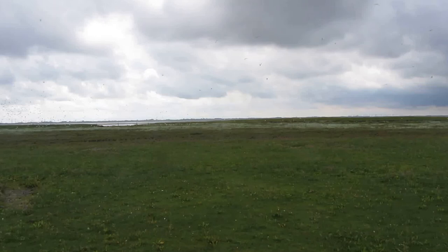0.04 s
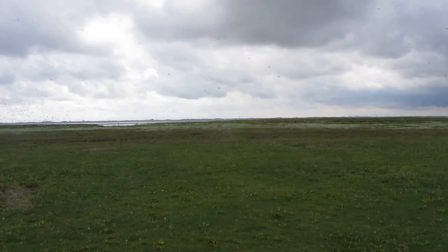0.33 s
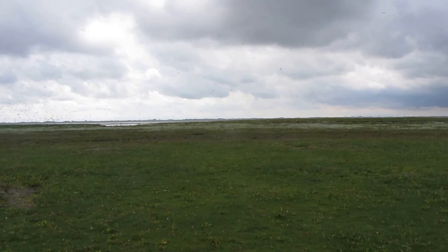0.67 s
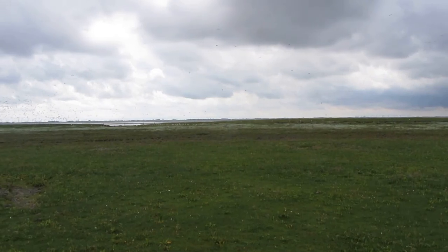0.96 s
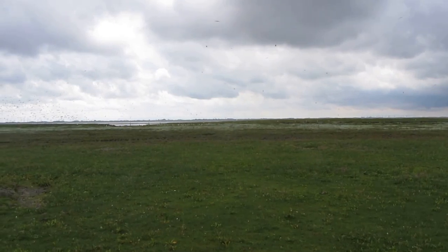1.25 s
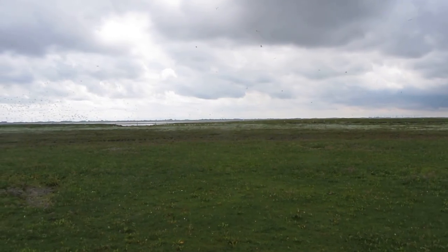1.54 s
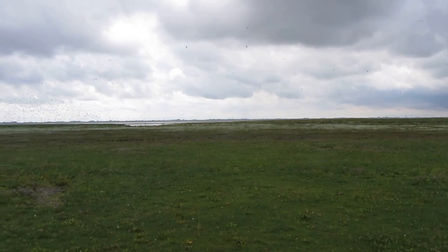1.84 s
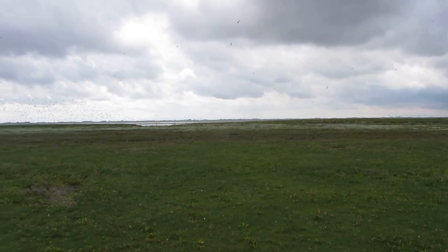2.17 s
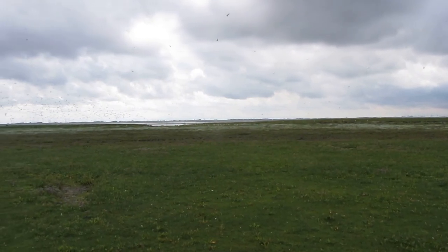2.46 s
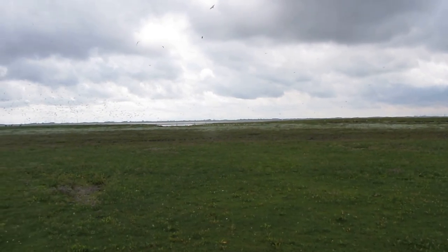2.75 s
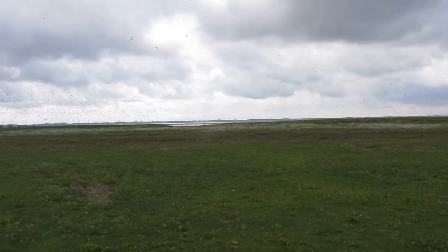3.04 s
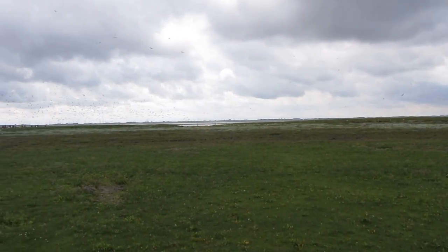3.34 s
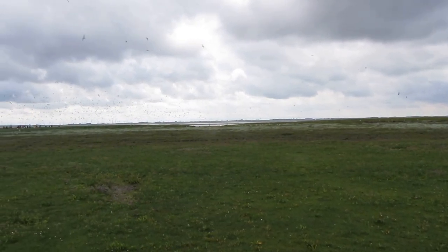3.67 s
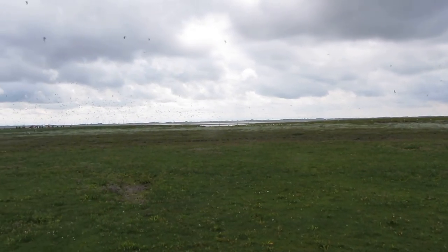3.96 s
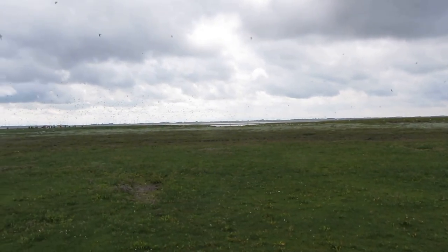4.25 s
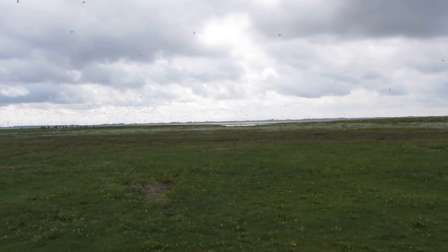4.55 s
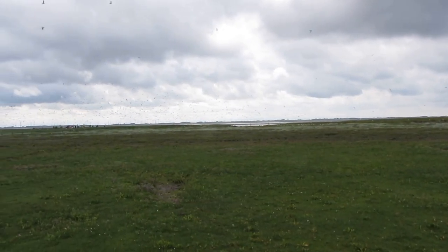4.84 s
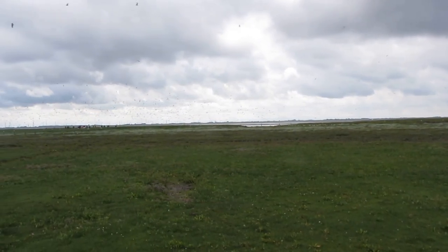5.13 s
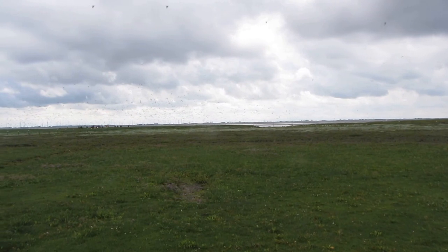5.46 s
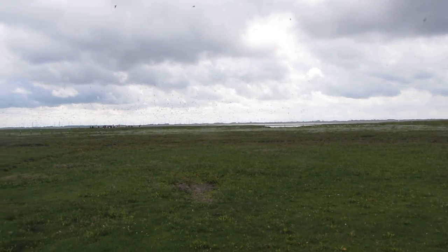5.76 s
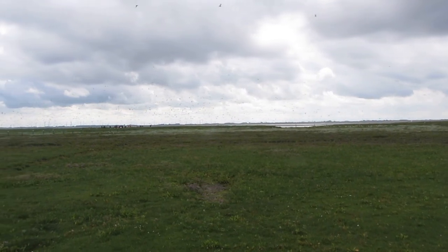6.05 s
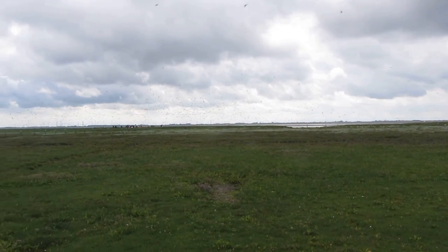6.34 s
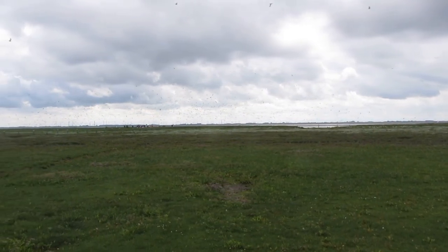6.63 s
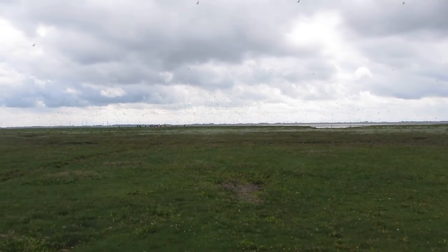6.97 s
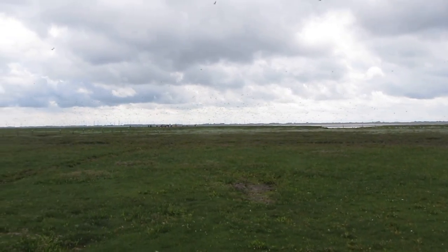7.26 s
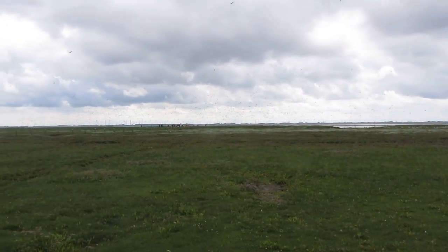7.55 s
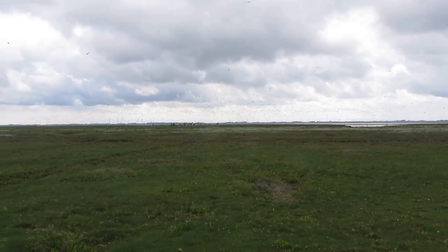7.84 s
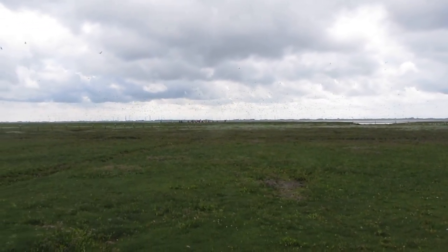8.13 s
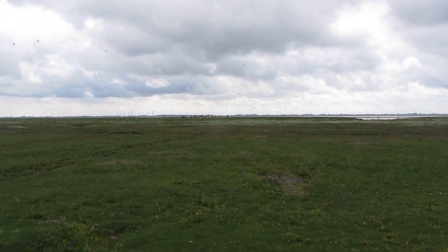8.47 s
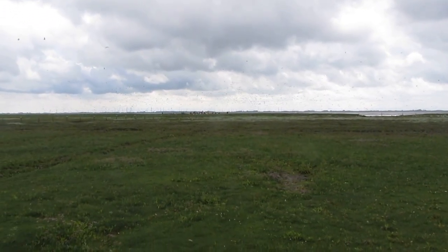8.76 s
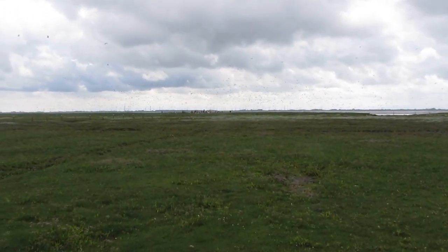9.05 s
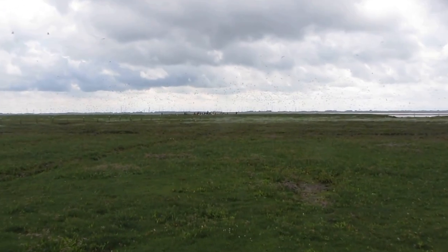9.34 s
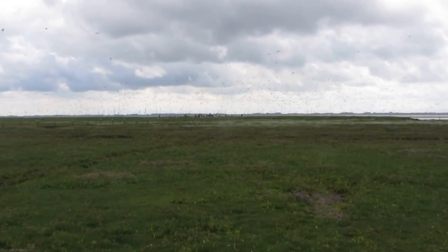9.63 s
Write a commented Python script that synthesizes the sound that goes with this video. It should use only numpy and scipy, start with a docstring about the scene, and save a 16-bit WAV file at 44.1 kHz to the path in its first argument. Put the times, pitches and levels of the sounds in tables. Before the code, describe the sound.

Wind buffets the microphone in an open coastal meadow while far gulls chatter and a nearer bird gives occasional thin, fluttering squeals.

```python
"""Wind on an open coastal meadow. From the start, grass and a far gull colony hiss while eddies rumble
and flap at a camera's two microphone ports, mostly the left. From 0.9 s a nearer bird gives runs of thin,
fluttering squeals, each trailed by a soft sizzle. By 1.5 s faint high twittering has risen and a few
clear mews begin. At 3.3-3.9 s something brushes the camera: small clicks, then a short scrape.
The loudest squeal comes at 4.4 s; from there on the gusts strike mostly the right port."""
import sys
import numpy as np
from scipy import signal
from scipy.fft import rfft, irfft, next_fast_len
from scipy.io import wavfile
from scipy.ndimage import uniform_filter1d, map_coordinates

SR = 44100
rng = np.random.default_rng(int(sys.argv[2]) if len(sys.argv) > 2 else 0)


def materialize(psi):
    """Save the field psi as 16-bit PCM at rate SR to the path in sys.argv[1].

    A 1-D psi becomes a single channel; in a 2-D psi each row is a channel.
    """
    bounded = np.clip(np.atleast_2d(psi).T, -1, 1)
    quanta = np.round(bounded * 32767).astype(np.int16)
    wavfile.write(sys.argv[1], SR, quanta)


N = 436590

# left-right likeness of far noise: freq_hz, coherence
FAR_COHERENCE = [(300, 0.84), (1300, 0.65), (2200, 0.71), (4000, 0.21), (6000, 0.43), (11000, 0.48)]


def amp(db):
    """Decibels to gain."""
    return np.exp(np.asarray(db) * (np.log(10) / 20))


def unit(x):
    """Scale to rms 1."""
    return x / np.sqrt(np.mean(x ** 2) + 1e-20)


def along(points, hz):
    """Interpolate (freq_hz, value) points on a log axis."""
    freq_hz, values = np.transpose(points)
    return np.interp(np.log(hz + 1), np.log(freq_hz + 1), values)


def curves(rows):
    """One value per sample for each column after time_s."""
    time_s, *columns = np.transpose(rows)
    return [np.interp(np.arange(N) / SR, time_s, column) for column in columns]


def wobble(rate_hz):
    """Smooth random curve with knots at rate_hz."""
    coarse = np.arange(0, N + 8, 8)
    knots = rng.standard_normal(int(N * rate_hz / SR) + 4)
    return np.interp(np.arange(N), coarse, map_coordinates(knots, [coarse * rate_hz / SR]))


def swell(length_s, attack_s, release_s):
    """Linear attack, hold and release, peak 1."""
    end_s = max(length_s, attack_s) + attack_s / 2
    t = np.arange(int((end_s + release_s) * SR)) / SR
    return np.interp(t, [0, attack_s, end_s, end_s + release_s], [0, 1, 1, 0])


def filtered(x, response):
    """Apply the complex gain response(hz)."""
    size = next_fast_len(N + SR // 4)
    gain = response(np.fft.rfftfreq(size, 1 / SR)).astype(np.complex64)
    return irfft(rfft(x.astype(np.float32), size) * gain, size)[..., :N]


def panned(side_db):
    """Constant-power gains; side_db is left minus right."""
    gains = amp(np.array([side_db, -side_db]) / 2).reshape(2, -1)
    return gains / np.sqrt(np.mean(gains ** 2, axis=0))


def add(out, start_s, sound):
    """Mix a sound in at start_s."""
    part = out[..., max(round(start_s * SR), 0):][..., :sound.shape[-1]]
    part += sound[..., :part.shape[-1]]


def rush(spectrum, coherence, patchy_db):
    """Stereo noise of rms 1 with random gain patches in time and frequency."""
    bins = rng.standard_normal((2, 257, 2 * (N // 256 + 3))).view(complex)
    patches = uniform_filter1d(rng.standard_normal(bins.shape[1:]), size=5, axis=0)
    patches = unit(uniform_filter1d(patches, size=14, axis=1))
    pair = signal.istft(bins * amp(patchy_db * patches), nperseg=512, window="cosine")[1][:, :N]
    mid_side_power = lambda hz: 1 + np.outer([1, -1], np.clip(along(coherence, hz), -1, 1))
    mid, side = filtered(pair, lambda hz: amp(along(spectrum, hz)) * np.sqrt(mid_side_power(hz)))
    return unit(np.array([mid + side, mid - side]))


def chatter(band, rate_hz, pitch_hz, log_spread, size_db):
    """Overlapping far cries, rms 1; each a short pitch arch from its own direction."""
    out, jitter = np.zeros((2, N)), wobble(400)
    u = np.linspace(0, 1, SR // 8)
    for when, pitch, size, crest, side in rng.random((int(rate_hz * N / SR), 5)):
        start = int(when * (N - len(u)))
        arch = 1 - .35 * (u - crest) ** 2 + .012 * jitter[start:][:len(u)]
        hz = pitch_hz * np.exp(log_spread * (2 * pitch - 1)) * arch
        phase = 2 * np.pi * np.cumsum(hz) / SR
        cry = np.sin(phase) + .8 * np.sin(2 * phase) + .5 * np.sin(3 * phase)
        add(out, start / SR, amp(size_db * size ** 2) * panned(6 * (side - .5)) * u * (1 - u) * cry)
    return unit(filtered(out, lambda hz: amp(along(band, hz))))


def voice(pitch_hz, partials):
    """Harmonic tone, slightly early at the left port."""
    lead_rad = np.array([[.04], [-.04]])
    phase = 2 * np.pi * np.cumsum(pitch_hz) / SR + lead_rad
    return np.sqrt(2) * sum(amp(db) * np.sin(k * phase + rng.random() * 2 * np.pi) for k, db in partials)


def from_afar(pair):
    """Far sound leads at the left port, except in the lows."""
    # phase between ports: freq_hz, left_lead_rad
    port_lead = [(1000, -0.7), (2000, 0.34), (3200, 1.13), (4400, 2.5), (6000, 4), (8000, 5), (11000, 3)]
    return filtered(pair, lambda hz: np.exp(.5j * np.outer([1, -1], along(port_lead, hz))))


def twitter():
    """Thin chirps of far small birds blur into a high band."""
    # flock loudness: time_s, level_db
    levels = [(0.2, -51.5), (1.5, -41.5), (2.4, -44), (3.3, -45.5), (4.3, -51), (5.6, -61), (9.9, -51)]
    # chirp spectrum: freq_hz, density_db
    band = [(3500, -25.5), (4500, -1), (5300, -0.5), (5900, -6), (7000, -24), (9000, -52.5)]
    level_db, = curves(levels)
    chirps = chatter(band, rate_hz=20, pitch_hz=5100, log_spread=.17, size_db=8)
    return amp(level_db) * (amp(-9.5) * chirps + rush(band, FAR_COHERENCE, patchy_db=3.5))


def colony_and_grass():
    """Far gulls and grass blades merge into a hiss; the nearest voices chatter in it."""
    # din loudness: time_s, level_db
    levels = [(0.2, -32), (0.39, -32.5), (1.28, -28), (2.9, -24.5), (3.06, -21.5), (4.58, -25.5),
              (5.98, -22.5), (6.04, -26.5), (6.22, -25.5), (6.28, -30.5), (7.6, -26.5), (7.9, -29),
              (8.46, -26.5), (8.87, -29.5), (9.19, -28.5), (9.25, -29.5), (9.57, -25), (9.9, -24.5)]
    # spectra of the din, its low wash and the grass top: freq_hz, density_db
    din_band = [(590, -61.5), (1000, -19), (1200, -19.5), (1340, -8.5), (1500, -9.5), (1980, -2.5),
                (2120, -1.5), (2800, -4), (3450, -16), (5440, -17), (7500, -40.5), (9750, -73),
                (16500, -120)]
    wash_band = [(100, -33), (250, -12), (500, -30.5), (750, -25.5), (1000, -12), (1200, -17),
                 (1500, -71.5)]
    top_band = [(2500, -30), (3800, -1), (5200, 1), (7500, 3), (9000, -3), (10500, -16), (12500, -29),
                (15500, -31)]
    level_db, = curves(levels)
    side_db = 0.7 - 0.3 * np.arange(N) / SR  # drifts right as the camera turns
    hiss = rush(din_band, FAR_COHERENCE, patchy_db=1.03)
    cries = chatter(din_band, rate_hz=45, pitch_hz=2150, log_spread=.3, size_db=8) * amp(-5)
    wash = rush(wash_band, FAR_COHERENCE, patchy_db=1.5) * amp(-21)
    top_db = -30 - 0.28 * (level_db - level_db.mean())  # swells less than the din
    top = rush(top_band, FAR_COHERENCE, patchy_db=3.0) * amp(top_db + 1.1 * wobble(4.6))
    return (hiss + cries + wash + top) * amp(level_db) * panned(side_db)


def gulls():
    """Far mews rise a little, then drop away."""
    # mews: start_s, length_s, top_hz, level_db
    mews = [(1.525, .095, 2020, -43.5), (2.02, .1, 1870, -46), (2.67, .08, 1920, -46),
            (2.76, .12, 1650, -43), (3.01, .09, 2030, -41), (4.12, .25, 1990, -41.5),
            (5.84, .16, 2030, -44), (6.33, .12, 1750, -48), (6.67, .1, 1750, -48), (7.1, .1, 1800, -47),
            (7.5, .1, 1950, -47), (8.41, .09, 1700, -48)]
    # timbre: harmonic, level_db
    partials = [(1, 2), (2, 0), (3, -5), (4, -22), (5, -33)]
    out, jitter, rasp = np.zeros((2, N)), wobble(400), wobble(120)
    for start_s, length_s, top_hz, level_db in mews:
        u = np.linspace(0, 1, int(length_s * SR))
        now = int(start_s * SR) + np.arange(len(u))
        arch = 1 - .35 * (u - .42) ** 2 - .1 * u ** 5
        pitch_hz = top_hz * (arch + 0.012 * jitter[now])
        envelope = amp(level_db + 3 * rasp[now]) * np.cbrt(np.sin(np.pi * u ** 1.4))
        add(out, start_s, envelope * voice(pitch_hz, partials))
    return out


def sizzle(attack_s=.18, release_s=.15, flutter_hz=41, flutter_db=2.2):
    """Soft, fluttering treble hiss after each run of squeals."""
    # swells of hiss: start_s, length_s, level_db
    swells = [(1.15, .42, -53), (4.573, .75, -55.5), (6.35, .58, -56), (7.8, .5, -56), (9.42, .5, -52)]
    # sizzle spectrum: freq_hz, density_db
    band = [(2500, -27), (5000, -5), (7500, 1.5), (9000, -2), (10500, -9.5), (12500, -19.5), (15500, -21.5)]
    gain = np.zeros(N)
    for start_s, length_s, level_db in swells:
        add(gain, start_s - attack_s / 2, amp(level_db) * swell(length_s, attack_s, release_s))
    flutter = np.sin(2 * np.pi * np.cumsum(flutter_hz + 3 * wobble(5.0)) / SR)
    return gain * amp(flutter_db * flutter) * rush(band, FAR_COHERENCE, patchy_db=2.0)


def squeals(flick_s=.015, edge_s=.02, flutter_hz=38, rasp_db=3):
    """Near bird: thin, fluttering notes with a hoarse onset; most flick up, then sag in pitch."""
    # notes: start_s, length_s, start_hz, end_hz, sag_exponent, flick_ratio,
    # level_db, fade_db, flutter_db, tilt_db (per harmonic above the third)
    notes = [(.878, .19, 1705, 1615, .7, .12, -49.5, 9, 5, -.8),
             (4.412, .1, 1705, 1500, 3, .14, -33, 6, 3, -3.6), (4.56, .03, 1560, 1520, 1, 0, -51, 1, 3, -1),
             (4.608, .085, 1535, 1505, 1, 0, -48.5, 2, 7, -1.8),
             (6.034, .21, 1650, 1525, .45, .03, -47, 7, 4, 0), (6.24, .1, 1535, 1570, 1, 0, -54, 6, 4, .3),
             (7.638, .23, 1650, 1515, .55, .03, -43, 14, 3, -.2),
             (9.27, .235, 1640, 1500, .55, .02, -45, 10, 3, .1)]
    # timbre, no fundamental: harmonic, level_db
    timbre = [(2, 8), (3, 6), (4, 0), (5, -8), (6, -16), (7, -19), (8, -23), (9, -22)]
    out, jitter, rasp, drift = np.zeros((2, N)), wobble(900), wobble(450), wobble(70)
    for (start_s, length_s, start_hz, end_hz, sag_exponent, flick_ratio,
         level_db, fade_db, flutter_db, tilt_db) in notes:
        t = np.arange(int(length_s * SR)) / SR
        u, now = t / length_s, round(start_s * SR) + np.arange(len(t))
        flutter_rad = 2 * np.pi * flutter_hz * t
        flick = np.exp(-(t / flick_s) ** 4)
        waver = .006 * (np.sin(flutter_rad) + .5 * drift[now])
        hoarseness = (.014 + .06 * flick) * jitter[now]
        glide_hz = start_hz + (end_hz - start_hz) * u ** sag_exponent
        pitch_hz = glide_hz * (1 - flick_ratio * flick + waver + hoarseness)
        edges = np.clip(np.minimum(t, length_s - t) / edge_s, 0, 1)
        gain = amp(level_db - fade_db * u - flutter_db * np.cos(flutter_rad) + rasp_db * rasp[now])
        partials = [(k, db + tilt_db * max(k - 3, 0)) for k, db in timbre]
        add(out, start_s, edges * gain * voice(pitch_hz, partials))
    return out


def brushes():
    """Touches on the camera start sharply; short ones click, the long one scrapes."""
    # contacts: start_s, length_s, level_db, fade_db
    touches = [(3.326, 0.013, -33, 1), (3.422, 0.011, -30, -3), (3.438, 0.034, -24.5, 11),
               (3.537, .008, -32, 1), (3.552, .032, -22.5, 9.5), (3.637, .014, -31, 4),
               (3.655, .016, -21, 0.5), (3.672, .018, -23.5, -0.5), (3.692, 0.21, -25.5, 4.5)]
    # friction spectrum: freq_hz, density_db
    band = [(800, -38), (2500, 7), (4500, 6.5), (6500, -5.5), (8000, -10.5), (10000, -14), (12000, -28),
            (14500, -28), (15700, -36)]
    pressure = np.zeros(N)
    for start_s, length_s, level_db, fade_db in touches:
        u = np.linspace(0, 1, int(length_s * SR))
        add(pressure, start_s, amp(level_db - fade_db * u) * (1 - u ** 12))
    grain = unit(amp(3 * wobble(450)))
    return pressure * grain * rush(band, [(2000, 1.0), (9000, 0.18)], patchy_db=-2)


def airflow(shelter, attack_s=.02, release_s=.013):
    """Rumble and buffet gains at each port: a slow breeze plus gusts, summed in power."""
    # breeze strength: time_s, level_db
    breeze = [(0.05, -28), (0.13, -23.5), (0.84, -39.5), (1.42, -28), (2.68, -30), (3.78, -28.5),
              (4.14, -33.5), (4.55, -32.5), (5.07, -32.5), (5.51, -24), (6.69, -39.5), (6.99, -44.5),
              (7.4, -33), (7.67, -25.5), (8.31, -36.5), (9.02, -28), (9.57, -40.5), (9.9, -32)]
    # windward side, left positive: time_s, base_side_db
    sides = [(0.05, 11), (0.65, 18), (1.72, -1.0), (1.89, 4.0), (4.11, -1.5), (9.18, -0.5), (9.9, -2)]
    # gusts at the ports: start_s, length_s, base_buffet_db, base_rumble_db, base_side_db
    gusts = [(0.111, 0.065, -32, -22.5, 0), (0.201, 0.088, -30, -29, 9), (0.611, 0.03, -26.5, -42, 10.0),
             (0.839, 0.054, -33.5, -24, 9.5), (0.915, 0.035, -32.5, -21, 11), (0.995, 0.13, -32, -36, 11),
             (1.143, 0.048, -33, -19.5, 6), (1.252, 0.16, -30.5, -27, 8), (1.456, 0.023, -26.5, -21, 11),
             (1.516, 0.025, -33, -30, 5), (1.585, 0.033, -29.5, -21, 7.5), (1.711, 0.13, -30.5, -26, 9),
             (1.917, 0.077, -31.5, -27.5, -2.0), (2.09, 0.054, -29.5, -28, 6), (2.192, 0.12, -27, -25, 5),
             (2.343, 0.071, -23, -30.5, 17), (2.488, 0.088, -30, -29.5, 12), (2.622, 0.042, -35, -27.5, 12),
             (2.851, 0.11, -30, -20.5, -16), (3.132, 0.1, -25.5, -23.5, 15),
             (3.324, 0.098, -30.5, -23.5, -5), (3.503, 0.25, -26.5, -23.5, 1),
             (3.79, 0.062, -28.5, -23.5, -14), (3.91, 0.055, -24, -24, -6.5),
             (4.031, 0.18, -28.5, -24, -5.5), (4.248, 0.05, -33, -30, -9), (4.308, 0.037, -32, -24, 4),
             (4.372, 0.313, -26.5, -26.5, -18), (4.773, 0.053, -22, -28.5, -16),
             (4.881, 0.074, -29.5, -23, -0.5), (5.267, 0.095, -24, -23.5, -3.5),
             (5.552, 0.083, -24, -28, -9), (5.696, 0.042, -26.5, -30, -20), (5.888, 0.038, -33, -26, -10),
             (5.997, 0.341, -25, -29.5, -11), (6.369, 0.048, -29, -31, -18), (6.508, 0.032, -31.5, -50, 6),
             (6.697, 0.059, -31.5, -32, 13), (6.787, 0.11, -35.5, -29, -13),
             (6.907, 0.314, -26.5, -24, -5.5), (7.415, 0.466, -23.5, -38.5, -8.5),
             (7.943, 0.244, -24.5, -28.5, -4), (8.238, 0.023, -24.5, -28, -1),
             (8.364, 0.29, -24.5, -29.5, -10), (8.734, 0.266, -23, -29.5, -3.5),
             (9.047, 0.13, -25, -30, -5.5), (9.21, 0.055, -29, -39, -13)]
    breeze_db, = curves(breeze)
    side_db, = curves(sides)
    rumble_power = amp(breeze_db + 0.5) ** 2
    flap_db = -40 + 1.04 * (breeze_db - breeze_db.mean()) + 3.8 * wobble(17)
    buffet_power = (amp(flap_db) * panned(shelter * side_db)) ** 2
    for start_s, length_s, buffet_db, rumble_db, gust_side_db in gusts:
        gust = swell(length_s, attack_s, release_s)
        onset_s = start_s - attack_s / 2
        add(rumble_power, onset_s, (gust * amp(rumble_db - 0.5)) ** 2)
        add(buffet_power, onset_s, (gust * amp(buffet_db + 2.5) * panned(shelter * gust_side_db)) ** 2)
    return np.sqrt(rumble_power) * panned(1.28 * side_db), np.sqrt(buffet_power)


def eddies(times_s, sizes, pitch_hz, width_cycles):
    """Each eddy is one short pressure swing of random phase."""
    offsets = np.arange(-256, 257)
    cycles = pitch_hz[:, None] * offsets / SR
    window = np.exp(-(cycles / width_cycles) ** 2)
    swing = window * np.sin(2 * np.pi * (cycles + rng.random((len(times_s), 1))))
    at = np.clip(np.round(times_s * SR).astype(int)[:, None] + offsets, 0, N - 1)
    return np.bincount(at.ravel(), (sizes[:, None] * swing).ravel(), N)


def flapping(force_db, rate_hz=300, size_db=6.0, centre_hz=363):
    """Stream of eddies, rms 1; bigger eddies and stronger wind give sharper swings."""
    # sharpening as the wind meets the ports head on: time_s, shift_octaves
    head_on = [(0, -0.33), (3, -0.11), (6, -0.073), (7.6, 0.37), (9, 0.38), (9.9, -0.15)]
    times_s = rng.random(int(rate_hz * N / SR)) * N / SR
    size, scatter = np.clip(rng.standard_normal((2, len(times_s))), -2, 1.5)
    excess_db = force_db[(times_s * SR).astype(int)] - np.mean(force_db)
    shift_octaves = np.interp(times_s, *np.transpose(head_on))
    sharpness = np.exp(0.31 * size + 0.43 * scatter + 0.025 * excess_db)
    pitch_hz = np.clip(centre_hz * 2 ** shift_octaves * sharpness, 130, 1200)
    stream = eddies(times_s, amp(size_db * size), pitch_hz, width_cycles=0.48)
    return unit(stream * amp(2.8 * wobble(40)))


def slaps(shelter, boost_db=6, delay_s=0.00187):
    """The hardest eddies hit the ports as single sharp swings."""
    # hits: time_s, base_peak_db, base_side_db
    hits = [(1.302, -12.5, 10), (1.974, -9.5, -10), (2.375, -16, 9.5), (2.496, -11.5, 5),
            (3.391, -7.5, -0.5), (3.687, -9.5, -9.0), (4.138, -6.5, -12), (4.668, -12, -11),
            (5.998, -10.5, -7), (6.244, -9, -8), (6.298, -13.5, -9.0), (7.001, -11.5, -12),
            (7.784, -7, -13), (8.058, -6, -8), (8.381, -7.5, -8.5), (8.489, -14, -9.0), (8.793, -9, -15),
            (8.871, -9, -9.0), (9.063, -15, -4)]
    time_s, peak_db, side_db = np.transpose(hits)
    pitch_hz = 680 * np.exp(0.1 * rng.standard_normal(len(time_s)))
    port_sizes = amp(peak_db + boost_db) * panned(shelter * side_db)
    return np.array([eddies(time_s + delay_s, sizes, pitch_hz, width_cycles=0.32) for sizes in port_sizes])


def at_ports(pair, leak_hz=285, skew_s=0.00036, low_hz=110, high_hz=1600):
    """An eddy at one port leaks to the other, duller and phase-shifted; both are band-passed."""
    crossing = lambda hz: np.exp(2j * np.pi * hz * skew_s) / np.sqrt(1 + (hz / leak_hz) ** 2)
    passband = lambda hz: 1 / (1 + (hz / high_hz) ** 6) * hz ** 2 / (hz ** 2 + low_hz ** 2)
    return filtered(pair + filtered(pair[::-1], crossing), passband)


def wind():
    """Big slow eddies press on both ports in phase; small fast ones flap at the windward port."""
    # big-eddy spectrum: freq_hz, density_db
    band = [(15, -52), (30, -26), (55, -11), (90, -3.5), (150, -1), (220, -5), (310, -9.5), (450, -23),
            (800, -44.5), (1500, -91)]
    # opening gust, driving the ports in antiphase: time_s, level_db
    shove_levels = [(.037, -22), (.07, -17), (.14, -8.5), (.18, -20), (.24, -16), (.3, -31), (.45, -42),
                    (1.1, -46), (1.3, -66)]
    shelter = 2.04  # scales side_db: an eddy is more one-sided before it leaks across
    rumble_gain, buffet_gain = airflow(shelter)
    force_db = 10 * np.log10(np.mean(buffet_gain ** 2, axis=0))
    shove_db, = curves(shove_levels)
    coherence = [(60, 0.95), (200, 0.99), (500, 0.89)]
    rumble = rumble_gain * amp(1.84 * wobble(22)) * rush(band, coherence, patchy_db=1)
    shove = amp(shove_db) * rush(band, [(100, -1)], patchy_db=1)
    buffets = buffet_gain * np.array([flapping(force_db) for _ in range(2)])
    return rumble + shove + at_ports(buffets + slaps(shelter))


def scene():
    """Open ground, no echo; the hiss opens loud and settles at once."""
    opening_db, settled_s, fall_s = 10, 0.17, 0.05
    opening = amp(opening_db * np.clip((settled_s - np.arange(N) / SR) / fall_s, 0, 1))
    near_wind = wind()
    far = from_afar(opening * (colony_and_grass() + twitter()) + sizzle())
    return near_wind + far + squeals() + gulls() + brushes()


def record(dry):
    """Round the hardest peaks, switch on just after the start, limit the band."""
    ceiling, start_s, rise_s, top_hz = .92, .037, 0.0062, 15750
    rounded = dry / (1 + np.abs(dry / ceiling) ** 6) ** (1 / 6)
    switched_on = np.clip((np.arange(N) / SR - start_s) / rise_s, 0, 1)
    return filtered(rounded * switched_on, lambda hz: hz < top_hz)


dry = scene()
out = record(dry)
materialize(out)
```